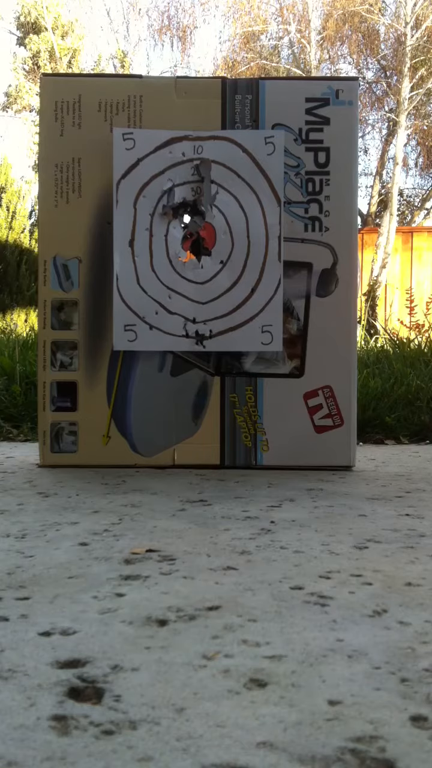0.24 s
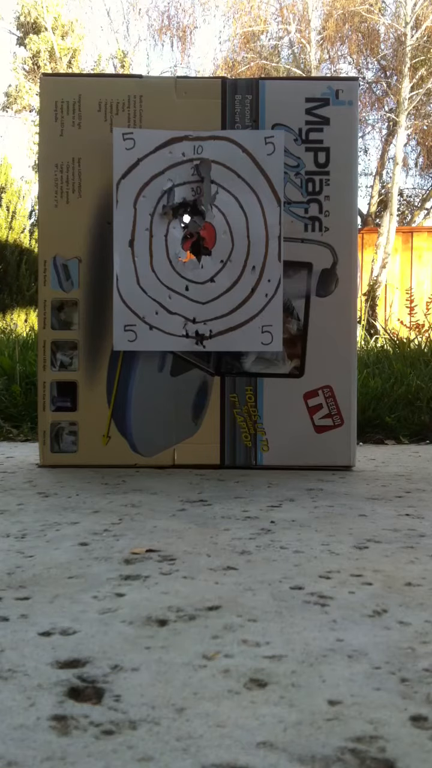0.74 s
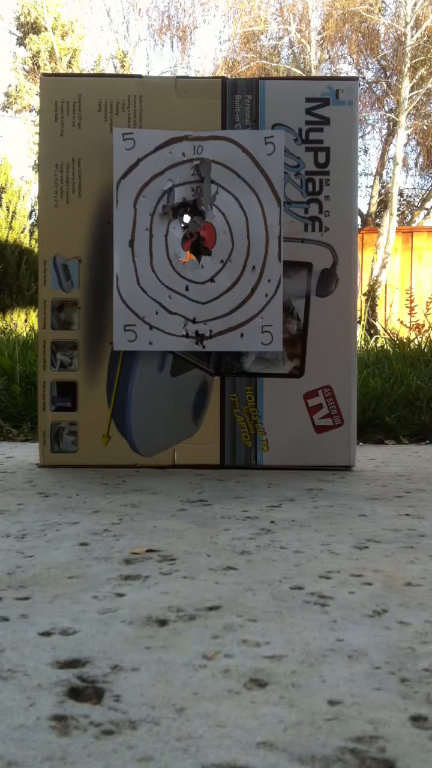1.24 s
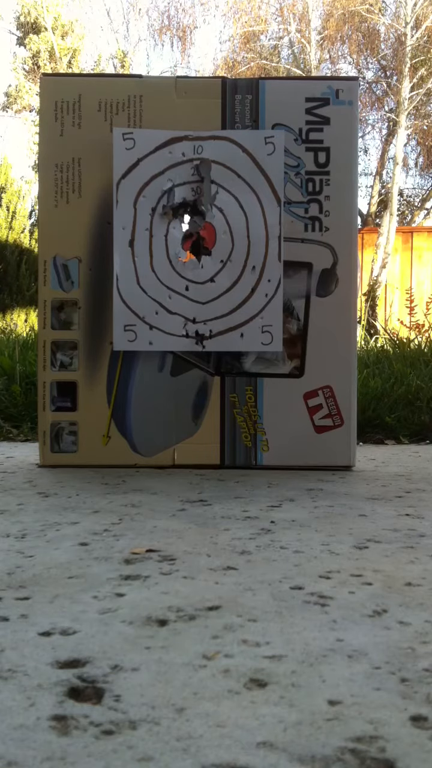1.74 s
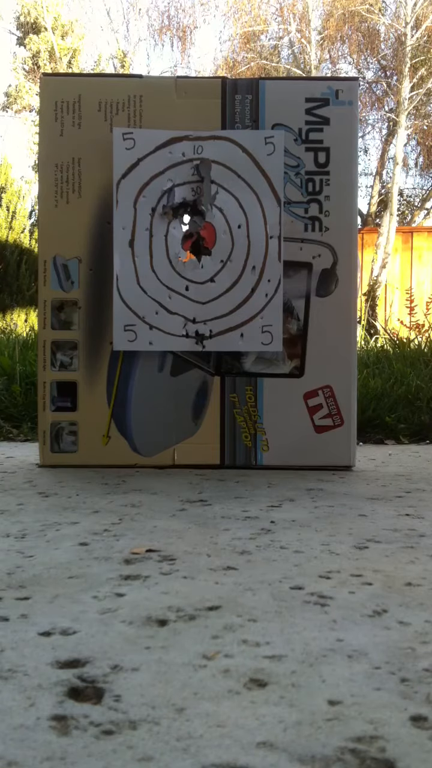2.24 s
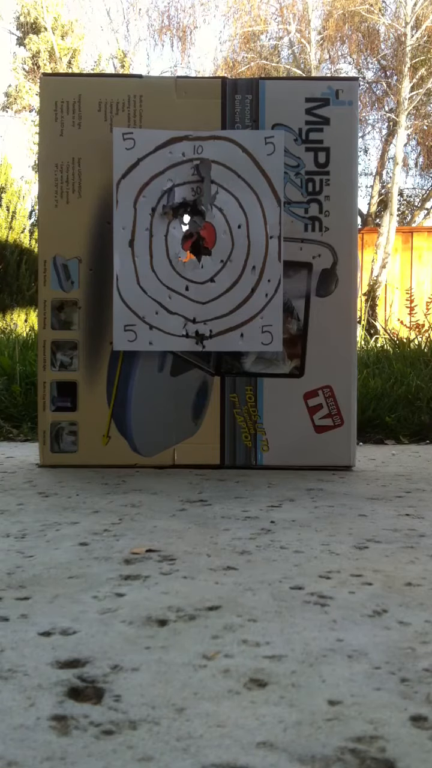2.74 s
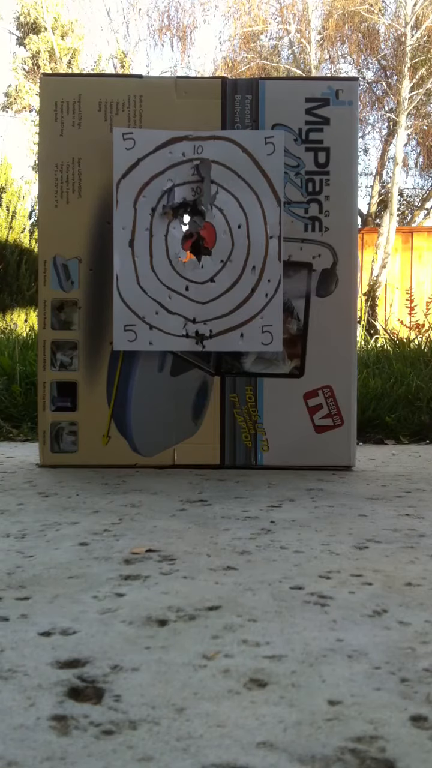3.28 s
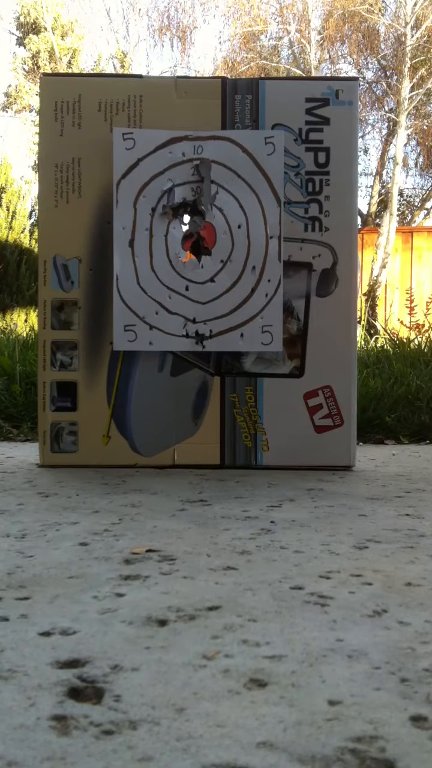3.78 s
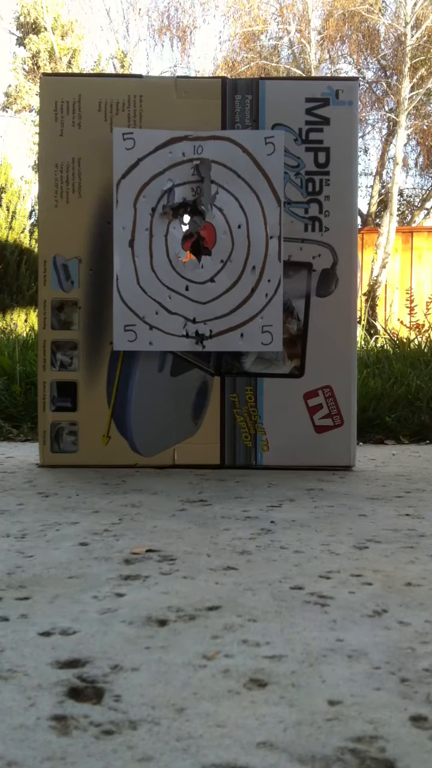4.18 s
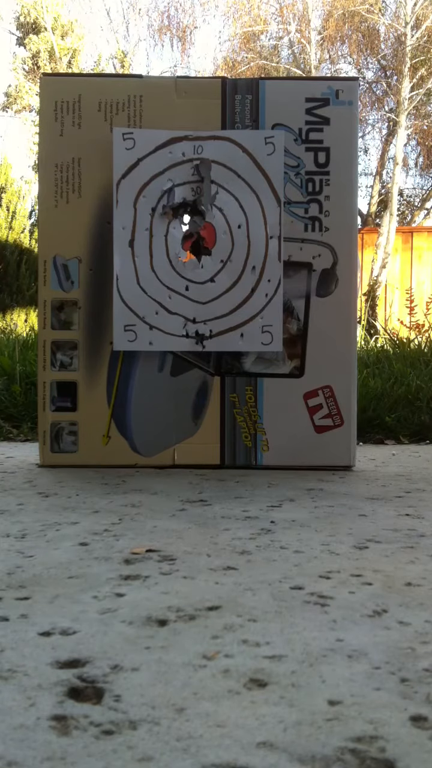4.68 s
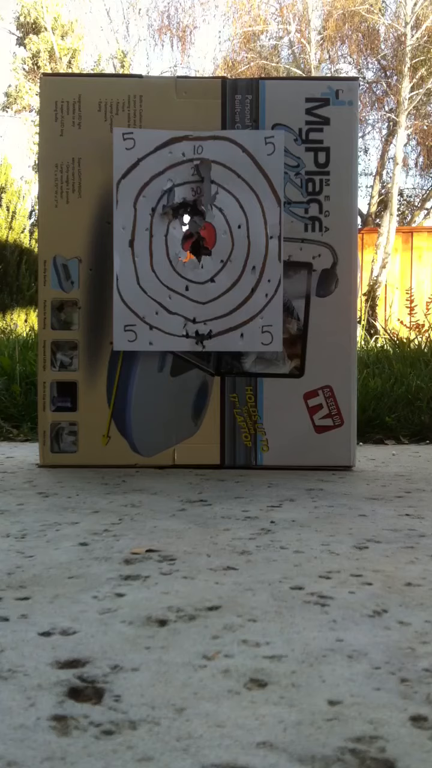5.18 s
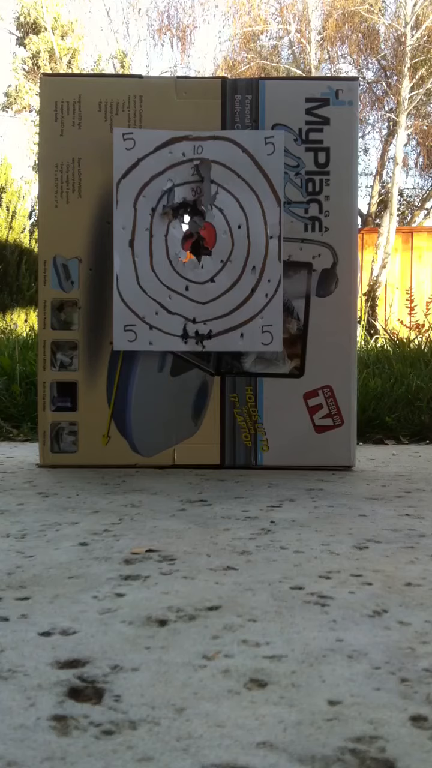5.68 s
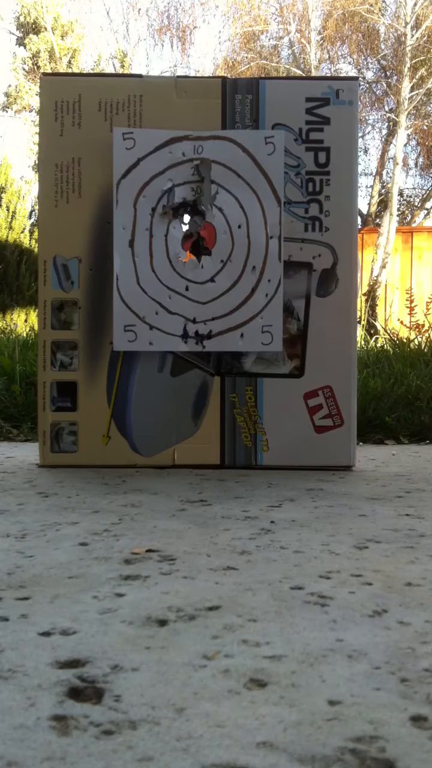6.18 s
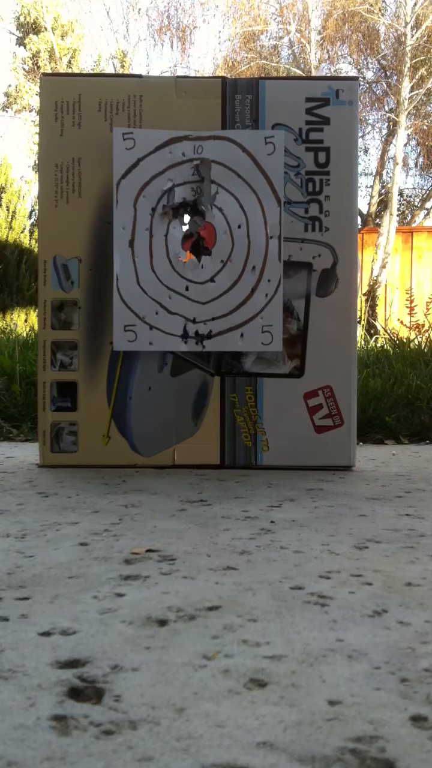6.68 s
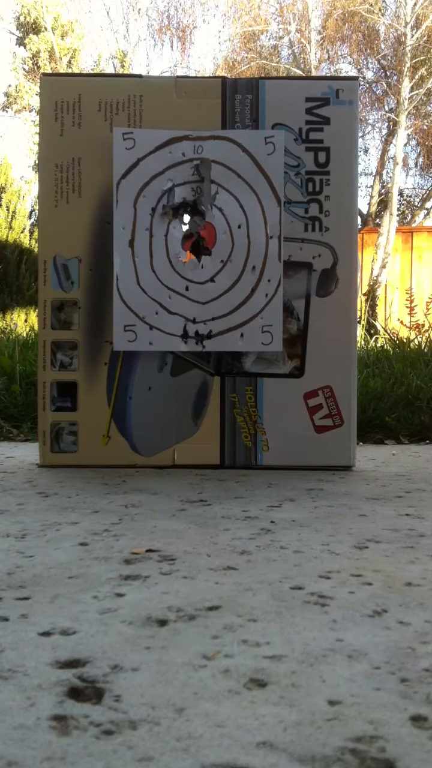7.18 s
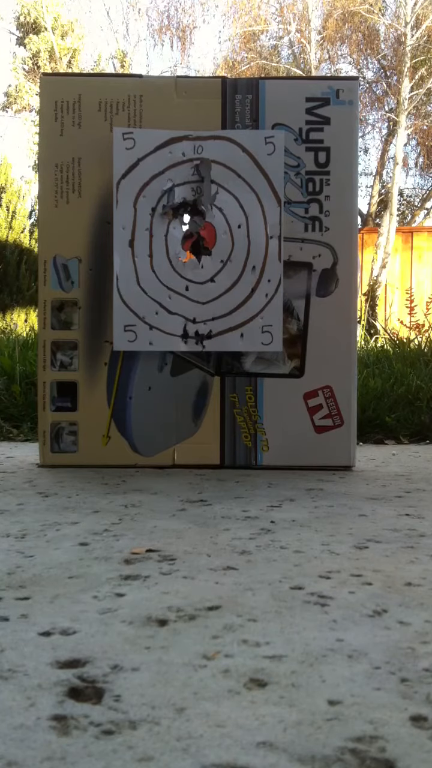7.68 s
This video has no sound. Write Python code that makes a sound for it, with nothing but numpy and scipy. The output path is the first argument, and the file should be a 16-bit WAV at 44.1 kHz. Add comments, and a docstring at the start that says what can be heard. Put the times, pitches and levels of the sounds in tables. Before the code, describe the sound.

An electric airsoft gun fires rapid automatic bursts outdoors, its motor whirring as pellets smack a cardboard box.

```python
"""In a quiet, fenced back yard, an electric airsoft gun fires automatic bursts at a cardboard box.
A motor winds the piston back through whining gears; each release pops air out of the muzzle,
and 18 ms later the pellet smacks the box, sometimes tearing its paper. Now and then no pellet
feeds and only air pops. The trigger and latch clack; the house and fence throw back a short echo."""
import sys
import numpy as np
from scipy import signal
from scipy.fft import rfft, irfft
from scipy.io import wavfile

SR = 44100
rng = np.random.default_rng(int(sys.argv[2]) if len(sys.argv) > 2 else 0)


def write(x):
    x = np.atleast_2d(x).T
    wavfile.write(sys.argv[1], SR, np.round(np.clip(x, -1, 1) * 32767).astype(np.int16))


N = 349713
TIME = np.arange(N) / SR
AGE = np.arange(-512, 3584) / SR   # seconds before and after one short event


def from_db(db):
    """Turn decibels into a volume factor."""
    return 10 ** (np.asarray(db) / 20)


def colour(x, tone):
    """Make some frequencies louder and others softer, following a tone table."""
    hz, db = np.transpose(tone)
    half = 4096
    grid = np.linspace(1, SR / 2, half + 1)
    gains = from_db(np.interp(np.log(grid), np.log(hz), db))
    cepstrum = irfft(np.log(gains))
    cepstrum[1:half] *= 2   # folded so the filter rings only after a sound, never before
    cepstrum[half + 1:] = 0
    response = irfft(np.exp(rfft(cepstrum)))[:half]
    return signal.oaconvolve(x, response)[:N]


def band(x, low_hz, high_hz, order=1):
    """Soften everything outside two frequencies."""
    return signal.sosfilt(signal.butter(order, [low_hz, high_hz], "band", fs=SR, output="sos"), x + 1e-18)


def place(times, db, shapes):
    """Lay one short shape per event on the time line."""
    size = len(AGE)
    out = np.zeros(N + 2 * size)
    for s, gain, shape in zip(times, from_db(db), np.broadcast_to(shapes, (len(times), size))):
        at = int((s + AGE[0]) * SR) + size
        out[at:at + size] += gain * shape
    return out[size:size + N]


def puffs(times, db, rise_s, fall_s, evenness):
    """Short puffs of noise; more evenness makes them more alike in tone."""
    envelope = np.exp(np.minimum(AGE / rise_s, -AGE / fall_s))
    spectra = rfft(rng.standard_normal((len(times), len(AGE))) * envelope)
    shapes = irfft(spectra / np.abs(spectra) ** min(evenness, 1))
    return place(times, db, shapes / np.linalg.norm(shapes, axis=1, keepdims=True))


def thumps(times, db, rise_s, fall_s, hz=184, q=1.59):
    """Single pushes of air; a ringing bass cut turns each into a tight thump."""
    w = 2 * np.pi * hz
    pushes = place(times, db, np.exp(np.minimum(AGE / rise_s, -AGE / fall_s)))
    return signal.lfilter(*signal.bilinear([1, 0, 0], [1, w / q, w * w], SR), pushes + 1e-18)


def rings(times, db, hz, t60, spread):
    """Tones that fade by 60 dB in t60 seconds, each at a slightly different pitch."""
    own_hz = hz * np.exp(spread * rng.standard_normal((len(times), 1)))
    fade = np.exp(-np.log(1000) * np.abs(AGE) / t60) * (AGE >= 0)
    return place(times, db, np.sin(2 * np.pi * own_hz * AGE) * fade)


def echo(times, db, rise_s, t60):
    """Many reflections blur into noise that swells and dies after each event."""
    age = TIME[:SR]
    power = (1 - np.exp(-age / rise_s)) ** 2 * np.exp(-2 * np.log(1000) * age / t60)
    total = signal.oaconvolve(place(times, db, AGE == 0) ** 2, power / power.sum())[:N]
    return np.sqrt(np.maximum(total, 0)) * rng.standard_normal(N)


# tone of the distant hush: (frequency [Hz], level [dB])
HUSH_TONE = [(30, -31.5), (130, -4.5), (700, -8.5), (2500, -27), (5500, -29.5), (7500, -29), (11000, -32),
             (15000, -28)]
# how loud the hush is: (time [s], level [dB])
HUSH_LEVELS = [(3.7, -69), (5.0, -62.5), (6.0, -65)]

def yard_hush():
    """A faint, low noise from far away swells a little and eases."""
    hush = colour(rng.standard_normal(N), HUSH_TONE)
    return hush / hush.std() * from_db(np.interp(TIME, *np.transpose(HUSH_LEVELS)))


# when the motor runs: (on [s], off [s], level [dB], level change while starting [dB])
TRIGGER_PULLS = [(-.04, 2.29, -3, 1.5), (2.833, 2.955, 0.5, 3.5), (3.235, 3.434, -2.5, -4),
                 (5.076, 5.45, -1.5, 12), (5.633, 5.8, 1, -1), (5.966, 6.24, -6, 6), (6.382, 8.3, -4, 4)]
# tone of the gearbox: (frequency [Hz], level [dB])
GEARBOX_TONE = [(80, -55), (270, -42), (380, -33.5), (500, -28.5), (660, -27.5), (930, -34), (1250, -44),
                (3200, -45), (3950, -42), (6000, -55.5), (14500, -49.5)]

def gearbox(shots, spin_up_s=.026, coast_s=.022, start_s=.12, motor_hz=332, sag=.1, whine_db=-16):
    """The motor spins up, slows as each stroke squeezes the spring, and coasts once switched off."""
    speed, level = np.zeros(N), np.zeros(N)
    for on, off, db, start_db in TRIGGER_PULLS:
        age = np.maximum(TIME - on, 0)
        turning = (1 - np.exp(-age / spin_up_s)) * np.exp(-np.maximum(TIME - off, 0) / coast_s)
        speed += np.sqrt(turning)
        level += turning * from_db(db + start_db * np.exp(-(age / start_s) ** 2))
    stroke = np.interp(TIME, shots, np.arange(len(shots))) % 1   # 0 to 1 between shots
    slack = 1.1 * rng.standard_normal(N)   # loose teeth blur the high overtones
    turns = np.cumsum(motor_hz * speed * (1 + sag * (.5 - stroke) + slack)) / SR
    whine = sum(np.sin(2 * np.pi * (k * turns + rng.random())) for k in range(1, 14))
    grind = rng.standard_normal(N) * (1 + .5 * np.sin(2 * np.pi * turns))   # the teeth rasp once a turn
    dull = band(grind, 200, 1500)
    grind = dull + (grind - dull) * speed ** 4   # slow teeth sound duller
    shaking = level * (grind + from_db(whine_db) * whine) + clacks()
    return colour(shaking, GEARBOX_TONE) + gun_body(shaking)


# notes the gun's body rings at: (pitch [Hz], width [Hz], level [dB])
BODY_NOTES = [(660, 19, -27), (820, 15, -27.5), (2420, 35, -37), (2630, 66, -38), (3940, 170, -36.5)]

def gun_body(x):
    """The plastic body rings at a few notes when shaken."""
    return sum(from_db(db) * signal.lfilter(*signal.iirpeak(hz, hz / width, fs=SR), x + 1e-18)
               for hz, width, db in BODY_NOTES)


# straining gears: (time [s], length [s], start pitch [Hz], end pitch [Hz], level [dB])
GEAR_SQUEALS = [(-.005, 0.046, 800, 1044, -33.5), (2.839, 0.039, 550, 874, -45),
                (3.233, 0.054, 520, 704, -31.5), (5.086, 0.036, 616, 982, -33.5),
                (5.121, 0.047, 843, 590, -28), (5.261, 0.038, 630, 686, -31),
                (5.631, 0.07398, 660, 993.3, -44), (5.988, 0.036, 554, 743, -29),
                (6.381, 0.059, 700, 1092, -37.5)]

def squeals(waver=.1):
    """Gear teeth under load sing short, unsteady, sliding tones."""
    out = np.zeros(N)
    slack = band(rng.standard_normal(N), 40, 200)
    wobble = 1 + waver * slack / slack.std()
    for s, length, start_hz, end_hz, db in GEAR_SQUEALS:
        along = np.clip((TIME - s) / length, 0, 1)
        turns = np.cumsum((start_hz + (end_hz - start_hz) * along) * wobble) / SR
        out += from_db(db) * np.sin(np.pi * along) * np.sin(2 * np.pi * turns)
    return out


# tones of the piston's slap, the air's crack and the yard's echo: (frequency [Hz], level [dB])
SLAP_TONE = [(150, 0), (650, 15), (1100, 7.5), (1600, 13), (2450, 20), (2750, 17), (3100, 4.5), (4200, 7.5),
             (8000, -13.5)]
CRACK_TONE = [(1000, -23), (7000, -7.5), (9000, 1), (13000, 9.5), (16000, 3)]
ECHO_TONE = [(80, -17.5), (200, 1.5), (2400, 4.5), (7500, 0), (15000, -1)]
# shots with a pellet: (time [s], air thump [dB], box thud [dB], box knock [dB], paper crack [dB])
PELLET_SHOTS = [(0.0536, -13, -22, 2, 3), (0.1551, -19, -12.5, 1, -4), (0.2406, -17, -10, -3.5, 3.5),
                (0.3241, -13, -17, -1.5, 2), (0.4069, -19, -24, -2.5, -3), (0.4896, -13, -8.5, -2.5, -1),
                (0.5729, -10, -24, -6, 6), (0.6557, -17, -11.5, -9.5, -1), (0.7389, -5, -6.5, -7, 3.5),
                (0.822, -11, -6, -6, 4.5), (0.9054, -6.5, -17, 1.5, 0.5), (0.989, -10.5, -15, -4, 4.5),
                (1.072, -13, -25.5, 4.5, -3), (1.1558, -21.5, -16.5, -1.5, 0.5),
                (1.2394, -15.5, -8.5, 3, 0), (1.323, -14, -34, 0.5, 1.5), (1.4064, -10.5, -15, 3, -3),
                (1.4903, -9, -10, 0, -3.5), (1.5746, -11, -11.5, -6.5, 2.5), (1.6584, -14, -33, 3, 0.5),
                (1.7422, -12.5, -38.5, -10, -8.5), (1.8264, -22.5, -12, -0.5, 5),
                (1.9104, -6, -17, -3, 1.5), (1.9949, -18.5, -21.5, -3.5, 4), (2.0793, -9, -29, 2, 2.5),
                (2.1633, -13, -13, 1.5, 3), (2.248, -13.5, -12.5, 2, 0), (2.9268, -14, -29, 2, 2),
                (3.2833, -24.5, -14.5, 2.5, -0.5), (3.3903, -7.5, -13.5, -0.5, -5),
                (5.16, -15.5, -29.5, 5, -8.5), (5.3408, -20, -37, -3.5, -4), (5.428, -13, -9.5, 2, -5.5),
                (5.7288, -9.5, -11.5, -2.5, -2), (6.0202, -14.5, -14, -3, 0),
                (6.4578, -8.5, -11.5, 0.5, -1.5), (6.5547, -12, -31, 1, 0.5), (6.6412, -9, -19, 0, 1.5),
                (6.7264, -26, -20, 2.5, -1.5), (6.8112, -21, -24, -4, 2.5), (6.8961, -17.5, -8.5, 1, -0.5),
                (6.9806, -11, -32, -4.5, 0.5), (7.3233, -22, -29, -3, -1), (7.5786, -15, -29, -3, 0),
                (7.8327, -8.5, -24, 2.5, 0)]

def muzzle(s, thump_db, cushion=.14, bounce_s=.0064):
    """Air rushes out ahead of the piston, which slaps home; the box face bounces the pop back."""
    pop_db = -4 - cushion * thump_db   # more air softens the piston's slap
    slap = colour(puffs(s - .0002, pop_db, rise_s=.0009, fall_s=.0011, evenness=.8), SLAP_TONE)
    crack = colour(puffs(s, pop_db, rise_s=.00022, fall_s=.00035, evenness=.58), CRACK_TONE)
    rush = band(puffs(s - .001, pop_db - 4.5, rise_s=.0005, fall_s=.0074, evenness=.17), 1200, 20000)
    thump = thumps(s, thump_db, rise_s=.0003, fall_s=.0007)
    bounce = np.interp(TIME - bounce_s, TIME, from_db(-10) * slap + from_db(-8.5) * crack)
    yard = colour(echo(s, pop_db - .5, rise_s=.00067, t60=.037), ECHO_TONE)
    return slap + crack + rush + thump + bounce + yard + from_db(15.5) * gun_body(slap)


# tones of the cracking paper and the rattling box: (frequency [Hz], level [dB])
PAPER_TONE = [(500, 4), (2000, 3.5), (9000, 1), (15000, 5)]
RATTLE_TONE = [(100, -10), (520, 19), (950, 11.5), (8000, -0.5)]
# notes the box's sides ring at: (pitch [Hz], level [dB], fade time [s])
BOX_NOTES = [(424, -34, 0.12), (520, -33.5, 0.13), (2386, -23.5, 0.04)]

def pellet_hits(s, thud_db, knock_db, crack_db, wall_delay_s=.0089):
    """The pellet cracks the paper, pushes the box's side in and rattles it; the house wall echoes."""
    force_db = .73 * knock_db + .53 * crack_db
    crack = colour(puffs(s, crack_db, rise_s=.00007, fall_s=.00035, evenness=.2), PAPER_TONE)
    thud = -thumps(s + .00018, thud_db, rise_s=.00015, fall_s=.0011)
    rattle = colour(puffs(s + .001, force_db, rise_s=.00028, fall_s=.007, evenness=.12), RATTLE_TONE)
    sides = sum(rings(s, knock_db + db, hz, t60, spread=.042) for hz, db, t60 in BOX_NOTES)
    wall = echo(s + wall_delay_s, force_db / 2, rise_s=.0011, t60=.15)
    far = band(echo(s + wall_delay_s, force_db / 2 - 13, rise_s=.016, t60=.55), 60, 2200)
    return crack + thud + rattle + sides + colour(wall + far, ECHO_TONE)


# pellets that tear through: (rough time [s], pitch [Hz], level [dB])
PAPER_TEARS = [(.43, 4700, 13.5), (.51, 5200, 16), (.59, 6200, 6), (.67, 6200, 12), (.92, 5800, 12.5),
               (1.59, 4900, 13.5), (1.93, 5200, 14.5), (7.34, 4200, 15.5), (7.60, 5200, 10.5)]

def tears(hits):
    """Torn paper lets go in a quick, briefly ringing crackle."""
    out = np.zeros(N)
    for s, hz, db in PAPER_TEARS:
        nearest_hit = hits[np.abs(hits - s).argmin()]
        crackle = puffs([nearest_hit], [db], rise_s=.00008, fall_s=.0005, evenness=.35)
        out += band(crackle, hz / 1.2, hz * 1.2, order=2)
    return out


# hits and pops that leave a ping: (time [s], pitch [Hz], level [dB])
SHORT_PINGS = [(1.258, 2420, -19), (6.829, 2406, -12), (7.0, 2370, -14), (7.065, 4753, -16.5)]

def pings():
    """Now and then a stiff spot is struck and rings for a moment."""
    return sum(rings([s], [db], hz, t60=.03, spread=.004) for s, hz, db in SHORT_PINGS)


# trigger and gear latch clacks: (time [s], relative level [dB])
LATCH_CLACKS = [(2.335, -2.5), (3.013, 3.5), (5.085, -0.5), (5.196, -6), (5.551, -7.5), (5.808, -1),
                (5.849, 6.5), (6.235, -5.5), (6.403, -9)]

def clacks():
    """The trigger and gear latch give the gearbox sharp knocks."""
    s, db = np.transpose(LATCH_CLACKS)
    return puffs(s, db + 28, rise_s=.00045, fall_s=.017, evenness=.42)


# tone of a pop with no pellet: (frequency [Hz], level [dB])
EMPTY_TONE = [(100, -16.5), (300, 17.5), (620, 11), (1000, 6), (2500, 8), (5500, -2.5), (8500, 2.5),
              (14000, -11)]
# shots with no pellet: (time [s], air thump [dB], relative pop level [dB])
EMPTY_SHOTS = [(5.2525, -15, -0.5), (6.1188, -17, -0.5), (7.0647, -9, 2), (7.1505, -15, 2),
               (7.2366, -16.5, 0), (7.407, -6, -3.5), (7.4919, -22, -1), (7.6619, -18.5, -2.5),
               (7.7466, -22.5, 0.5), (7.9164, -17, 1.5)]

def empty_barrel(s, thump_db, relative_db):
    """With no pellet in the way, the air leaves in a longer, brighter pop."""
    pop_db = relative_db + 2.5
    pop = colour(puffs(s, pop_db, rise_s=.00078, fall_s=.0032, evenness=.047), EMPTY_TONE)
    crack = colour(puffs(s, pop_db - 4.5, rise_s=.0011, fall_s=.00037, evenness=.31), CRACK_TONE)
    thump = -thumps(s, thump_db, rise_s=.00023, fall_s=.00064)
    yard = colour(echo(s, pop_db - 5.5, rise_s=.0022, t60=.19), ECHO_TONE)
    return pop + crack + thump + yard + from_db(35.5) * gun_body(pop)


def scene(flight_s=.0184):
    """The gun and the box over the quiet of the yard."""
    s, thump_db, *hit_db = np.transpose(PELLET_SHOTS)
    empty_s, *empty_db = np.transpose(EMPTY_SHOTS)
    hits = s + flight_s
    hush = yard_hush()
    pops = muzzle(s, thump_db) + empty_barrel(empty_s, *empty_db)
    motor = gearbox(np.sort(np.r_[s, empty_s])) + squeals()
    return (hush + motor + pops + pellet_hits(hits, *hit_db) + tears(hits) + pings())[None]


def record(dry, low_cut_hz=52, high_cut_hz=16100, ceiling=.8):
    """A small microphone loses the deep bass, rounds the loudest peaks and cuts the highest treble."""
    heard = signal.sosfilt(signal.butter(1, low_cut_hz, "high", fs=SR, output="sos"), dry)
    rounded = ceiling * np.tanh(heard / ceiling)
    return signal.sosfilt(signal.ellip(10, .2, 80, high_cut_hz, fs=SR, output="sos"), rounded)


dry = scene()
out = record(dry)
write(out)
```